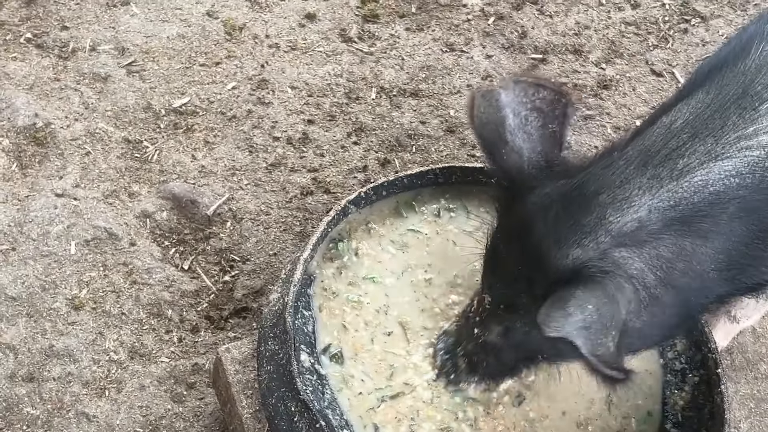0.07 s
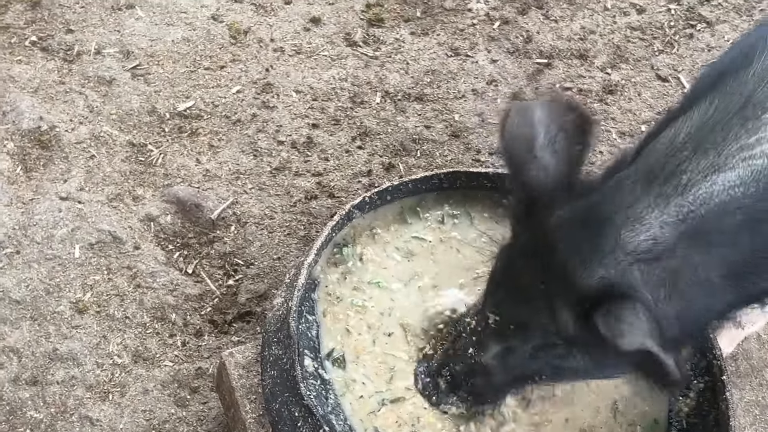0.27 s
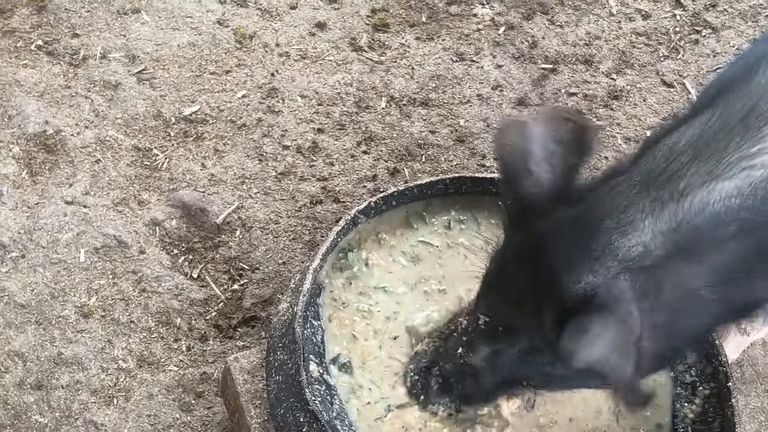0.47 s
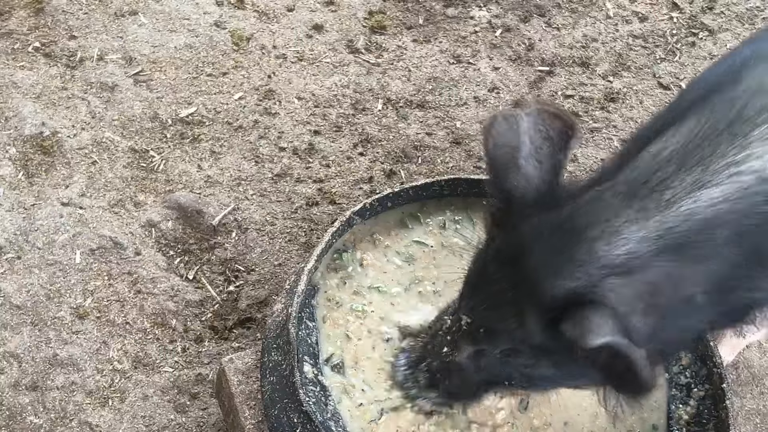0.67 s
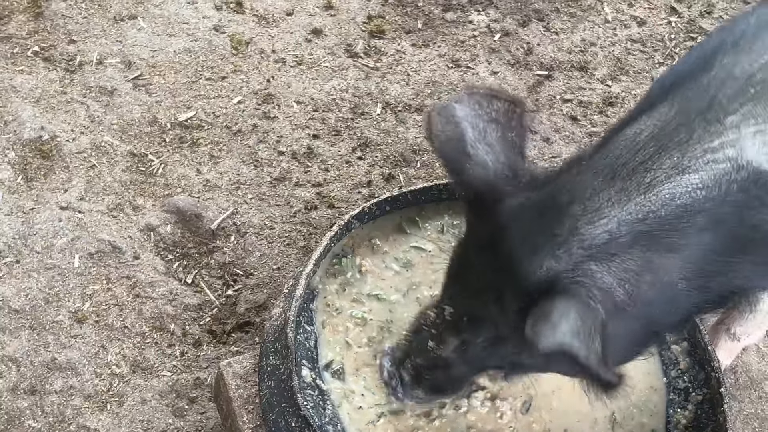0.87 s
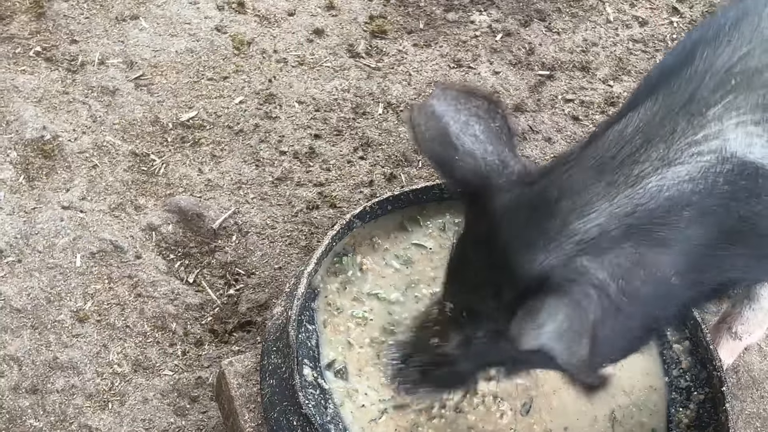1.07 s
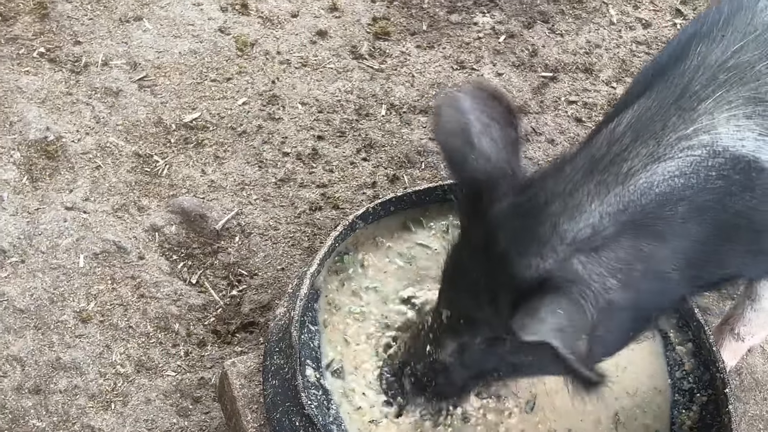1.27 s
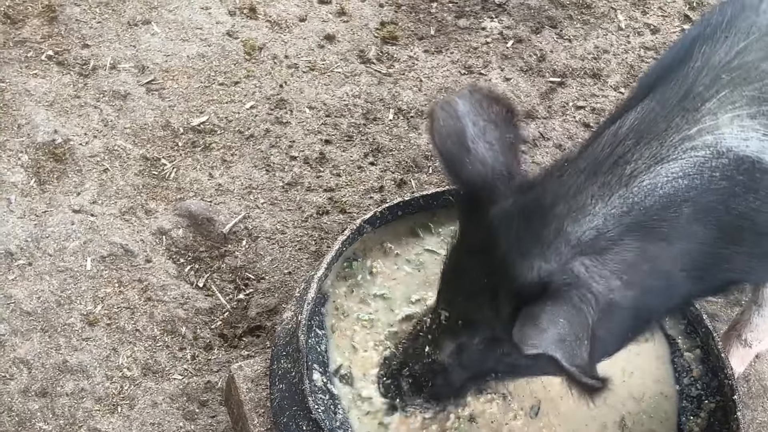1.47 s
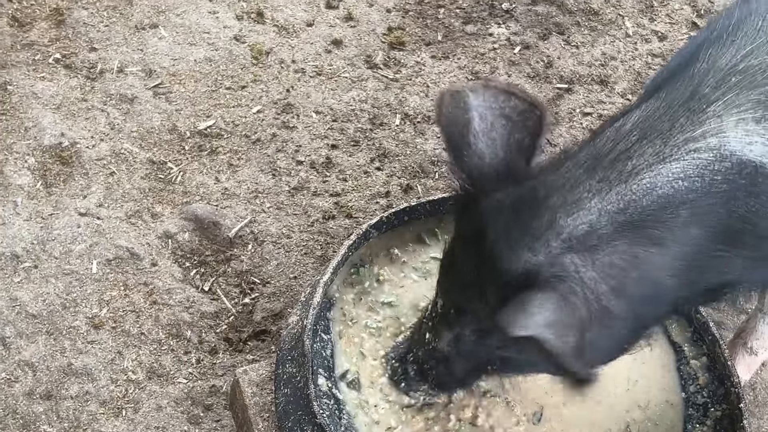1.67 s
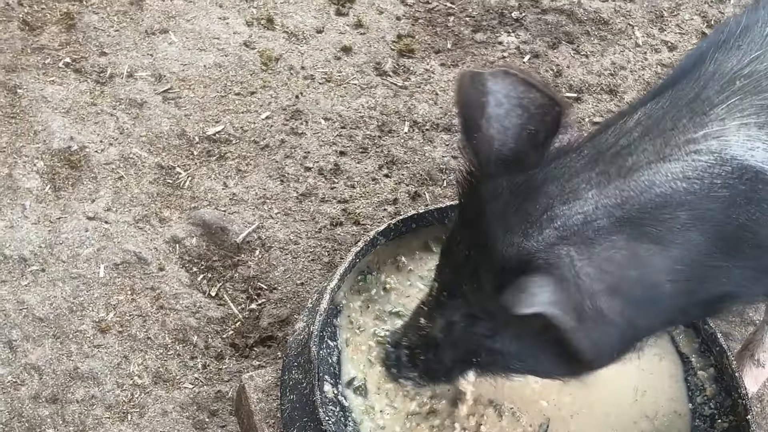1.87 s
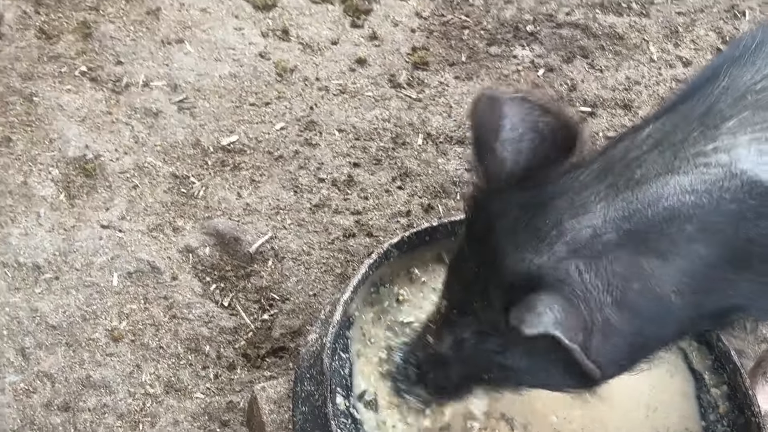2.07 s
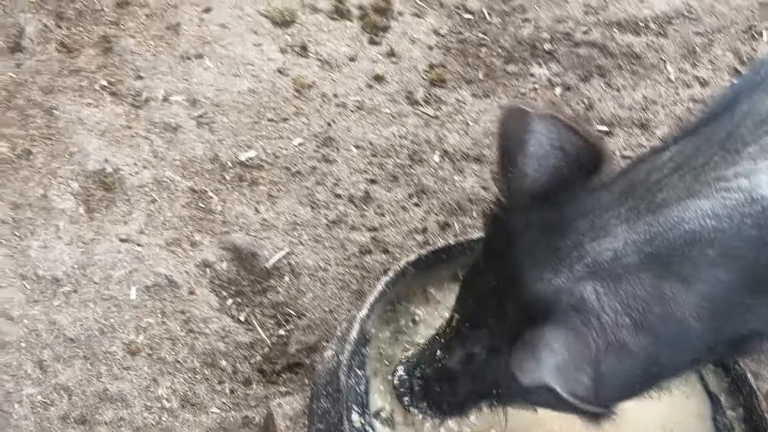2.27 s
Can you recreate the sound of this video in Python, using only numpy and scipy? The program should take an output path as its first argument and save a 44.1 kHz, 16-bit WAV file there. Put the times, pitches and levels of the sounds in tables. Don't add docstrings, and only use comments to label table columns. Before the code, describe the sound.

A pig eats wet mash very close to the microphone: quick irregular squelches, sharp jaw smacks, lip ticks, bubble pops and soft bowl knocks, about four bites a second, over quiet outdoor hiss and pulsing high cricket buzz.

```python
import sys
import numpy as np
from scipy import signal
from scipy.io import wavfile
from scipy.ndimage import uniform_filter1d

SR = 44100
rng = np.random.default_rng(int(sys.argv[2]) if len(sys.argv) > 2 else 0)


def invert_db(x):
    u = np.asarray(x, float) / 20
    return 10 ** u


def put_to_file(sound):
    columns = np.atleast_2d(sound).T
    safe = np.clip(columns, -1, 1)
    whole_steps = np.round(safe * 32767)
    wavfile.write(sys.argv[1], SR, whole_steps.astype(np.int16))


N = 103635


def evened(x):
    return x / np.sqrt(np.mean(x ** 2) + 1e-20)


def add(mix, s, sound):
    at = round(s * SR)
    sound = sound[max(-at, 0):]
    part = mix[max(at, 0):][:len(sound)]
    part += sound[:len(part)]


def ring(hz, t60, glide, rise_cycles=1.5):
    t = np.arange(0, max(t60, 0.002), 1 / SR)
    turns = hz * (t + glide * (t ** 2 / t60 - 0.37 * t))
    attack = 1 - np.exp(-t * hz / rise_cycles)
    shape = attack * invert_db(-60 * (t / t60) ** 1.53)
    return shape / shape.max() * np.sin(2 * np.pi * turns)


def pockets(table, glide, cycles):
    out = np.zeros(N)
    for s, db, hz in table:
        t60 = cycles / hz * invert_db(0.2 * (db + 22))
        add(out, s, invert_db(db) * ring(hz, t60, glide))
    return out


def yard():
    # frequency in Hz, level in dB per Hz.
    hiss_colour = [(24, -37), (40, 3.5), (805, 3.5), (1700, -0.5), (2080, -0.5), (2810, -0.5), (3110, -3),
                   (11100, -7), (15800, -13.5)]
    hiss_db, hum_hz, hum_db = -48, 117, -68.5
    hz = np.fft.rfftfreq(1024, 1 / SR)
    a, b, patches = rng.standard_normal((N // 256 + 5, 513, 3)).T
    patches = uniform_filter1d(patches, size=12, axis=0)
    patches = evened(uniform_filter1d(patches, size=12, axis=1))
    f, level = np.transpose(hiss_colour)
    colour_db = np.interp(np.log(hz + 1), np.log(f + 1), level)[:, None]
    spectrum = (a + 1j * b) * invert_db(colour_db + 2.2 * patches)
    hiss = signal.istft(spectrum, nperseg=1024, noverlap=768)[1][:N]
    wander = evened(uniform_filter1d(rng.standard_normal(N), size=4000))
    hum = np.sin(2 * np.pi * np.cumsum(hum_hz + 3.16 * wander) / SR)
    return invert_db(hiss_db) * evened(hiss) + invert_db(hum_db) * hum


def cricket():
    # start in seconds, level in dB.
    near_phrases = [(-.145, -50), (.065, -50), (.278, -50), (.49, -50), (.708, -50.5), (.93, -50.5),
                    (1.2, -51), (1.432, -51), (1.66, -51), (1.893, -51), (2.142, -50)]
    # start in seconds, level in dB.
    far_phrases = [
        (1.59, -59),
        (1.83, -56),
        (2.07, -57),
        (2.3, -56),
    ]
    near_hz, far_hz, start_drop_hz, scatter_hz = 11580, 11000, 480, 190
    phrase_s, stroke_s, strokes_per_s = 0.176, 0.0011, 224
    weak_stroke_db, uneven_db, swell_db = -1.5, 1.6, -5

    out, t = np.zeros(N), np.arange(0, phrase_s, 1 / SR)
    turns = t * strokes_per_s
    stroke, since = turns.astype(int), (turns % 1) / strokes_per_s
    shape = since / stroke_s * np.exp(-since / stroke_s)
    shape *= invert_db(weak_stroke_db * (stroke % 2))
    warming = np.exp(-t / phrase_s / 0.25)
    fades = np.clip(np.minimum(t, phrase_s - t) / 0.012, 0, 1)
    swell = invert_db(swell_db * warming) * fades
    for phrases, hz in ((near_phrases, near_hz), (far_phrases, far_hz)):
        for s, db in phrases:
            phase, off, size = rng.standard_normal((80, 3))[stroke].T
            pitch = hz - start_drop_hz * warming - scatter_hz * abs(off)
            wing = shape * invert_db(uneven_db * size) * np.sin(2 * np.pi * (pitch * since + phase))
            add(out, s, invert_db(db) * evened(wing) * swell)
    return out


def surroundings(x):
    # delay in seconds, level in dB.
    bounces = [
        (.0023, -19),
        (.0052, -26),
    ]
    pen_t60_s, pen_db, delay_s = 0.08, -12.5, 0.0011
    taps = np.zeros(8000)
    at = np.arange(100, 7980, 20) + rng.integers(0, 20, 394)
    taps[at] = rng.choice([-1., 1.], len(at)) * invert_db(-60 * at / SR / pen_t60_s)
    taps *= invert_db(pen_db) / np.linalg.norm(taps)
    taps[0] = 1
    for s, db in bounces:
        taps[round(s * SR)] += invert_db(db)
    return signal.oaconvolve(x, np.pad(taps, (round(delay_s * SR), 0)))[:N]


def nudges():
    # start in seconds, peak level in dB, pitch in Hz.
    bowl_nudges = [
        (.243, -34.5, 373),
        (.434, -27.5, 356),
        (.636, -30, 274),
        (1.144, -28, 524),
        (.727, -39, 322),
        (1.568, -23.5, 387),
        (1.925, -42.5, 130),
        (1.97, -43, 110),
        (2.03, -40, 233),
    ]
    return pockets(bowl_nudges, glide=0.12, cycles=5.46)


def bubbles():
    # start in seconds, peak level in dB,
    # pitch in Hz.
    bursts = [(0.172, -31, 1850), (0.2429, -28, 4900), (0.2523, -28.5, 4620), (0.394, -29, 1395),
              (0.4348, -28, 1265), (0.4493, -28.5, 1705), (0.5776, -33.5, 3790), (0.623, -29.5, 1890),
              (0.857, -25, 3220), (0.9017, -31.5, 1720), (0.9407, -34.5, 2020), (1.1441, -16.5, 4300),
              (1.2974, -32.5, 3530), (1.3066, -29.5, 2070), (1.3663, -22, 5000), (1.3718, -17.5, 4090),
              (1.604, -23, 3420), (0.66, -28, 4300), (0.641, -26, 1100), (1.6644, -25, 3980),
              (1.7482, -30.5, 1890), (1.9649, -30, 3350), (1.9746, -28.5, 3000), (1.995, -29, 3170),
              (0.376, -30, 3600),
        (0.526, -31, 3660),
        (0.6505, -10.5, 2053),
        (1.3857, -28, 4170),
        (1.558, -34, 1990),
        (1.843, -35.5, 2410),
        (2.017, -28.5, 1880),
        (2.0562, -26, 2700),
        (2.1773, -35.5, 2020),
        (2.3326, -34.5, 3120),
              (0.393, -22, 4300),
        (0.6273, -30, 3020),
        (0.6357, -19.5, 4230),
        (0.645, -20, 4230),
    ]
    faint_pops = [(0.165, -31, 5560), (.299, -36, 2100), (.333, -36, 2100), (.347, -38, 2190), (.386, -36, 853),
                  (.402, -33, 6800), (1.001, -39, 2300), (1.105, -37, 1900), (1.134, -35, 1680),
                  (1.194, -38.5, 2000), (1.347, -37, 3200), (1.475, -36.5, 2180), (1.522, -37, 3100),
                  (1.737, -35, 3100), (1.76, -34, 3420)]
    return pockets(bursts + faint_pops, glide=0.08, cycles=19)


def sprays():
    # start in seconds, length in seconds, level in dB, centre in Hz.
    lip_sprays = [(.23, .022, -35.5, 6660), (0.26, 0.021, -35.5, 7500), (0.429, 0.027, -39, 7540),
                  (0.447, 0.018, -34, 3720), (.636, .022, -37, 13000), (0.89, .006, -40, 9500),
                  (0.899, 0.018, -33, 7800), (.915, 0.04, -43, 8500), (.937, .006, -42, 11000),
                  (0.947, 0.0087, -35.5, 3530), (0.945, .008, -44, 12500), (1.801, 0.024, -41, 7000),
                  (2.007, 0.0054, -40, 10500), (2.017, .006, -45, 9700), (2.025, .017, -36, 10500),
                  (2.055, 0.0046, -33, 9000), (2.057, .008, -34, 10500), (1.458, 0.077, -49, 2760)]
    width, fade_db, grain_db = 1.46, -9.5, 1.5
    out = np.zeros(N)
    for s, length, db, hz in lip_sprays:
        noise, drift = rng.standard_normal((2, 3000))
        u = np.arange(3000) / SR / length
        grain = invert_db(grain_db * evened(uniform_filter1d(drift, size=30)))
        band = signal.butter(2, [hz / width, min(hz * width, 20000)], "band", fs=SR)
        hiss = evened(signal.lfilter(*band, noise * grain))
        fades = np.clip(np.minimum(u / 0.092, (1 - u) / 0.17), 0, 1)
        add(out, s, hiss * invert_db(db + fade_db * u) * fades)
    return out


def ticks():
    # start in seconds, peak level in dB, pitch in Hz.
    partings = [(0.196, -32, 8750), (0.2147, -35, 8950), (0.24, -30, 7500), (0.2585, -28, 7600),
                (0.2625, -22, 7640), (0.601, -38, 7300), (0.635, -19, 6980), (0.6502, -15.5, 5520),
                (0.6794, -49, 9800), (0.844, -31.5, 8300), (0.9019, -29.5, 6640), (0.648, -26, 11600),
                (1.0715, -33, 5800), (1.074, -35, 8500), (1.09, -34, 6500), (1.1269, -34, 6850),
                (1.1442, -21.5, 7400), (1.352, -29, 13000), (1.365, -23, 12900), (1.371, -22.5, 11200),
                (1.615, -35, 9500), (1.3362, -29.5, 10600), (1.3638, -23, 5940), (1.5688, -39, 6000),
                (1.6648, -28.5, 8100), (1.756, -33, 10200), (1.7812, -28, 7800), (2.0078, -37, 9200),
                (2.0265, -26, 9530), (2.0601, -24, 6570), (2.333, -35, 7700)]
    t60_s, scatter, splinter_db = 0.0057, 0.16, -5
    out = np.zeros(N)
    for s, db, hz in partings:
        add(out, s, invert_db(db - 1.5) * ring(hz, t60_s, 0.017, 0.83))
        for off, late in rng.uniform(-1, 1, (3, 2)):
            pitch = hz * (1 + scatter * (off + np.sign(off) / 2))
            splinter = ring(pitch, t60_s / 2, 0.017, 0.83)
            add(out, s + 0.0012 * abs(late), invert_db(db + splinter_db) * splinter)
    return out


def smacks():
    # start in seconds, peak level in dB.
    jaw_smacks = [(0.395, -21), (0.4319, -14), (0.577, -28), (0.6195, -32), (0.6357, -7.5), (0.662, -26),
                  (0.899, -22.5), (1.1101, -23), (1.1425, -10.5), (1.365, -12.5), (1.3714, -19),
                  (1.5676, -10), (1.7804, -15), (1.973, -25.5), (2.0252, -17.5), (2.0582, -13.5)]
    t = np.arange(400) / SR / 0.0011
    shape = t * np.exp(1 - t) / 2
    band = signal.butter(1, [900, 9000], "band", fs=SR)
    out = np.zeros(N)
    for s, db in jaw_smacks:
        crack = signal.lfilter(*band, rng.standard_normal(400))
        add(out, s, invert_db(db - 1.5) * crack * shape)
    return out


def plops():
    # start in seconds, peak level in dB, pitch in Hz.
    cavity_plops = [(0.234, -29.5, 756), (0.251, -26.5, 646), (0.367, -30, 835), (0.391, -30.5, 800),
                    (0.4335, -23.5, 565), (0.445, -25, 785), (0.59, -27.5, 870), (0.636, -20.5, 702),
                    (0.642, -18.5, 569), (0.647, -19, 634), (0.907, -34.5, 720), (0.9385, -37, 700),
                    (1.143, -28.5, 827), (1.364, -25.5, 667), (1.567, -20.5, 613), (1.8, -26, 613),
                    (1.815, -31, 394), (1.982, -32, 940), (2.031, -31.5, 746), (2.193, -35, 870),
                    (.2415, -32.5, 757), (.2468, -31, 630), (.9125, -30, 636), (.9225, -34, 1530),
               (.9245, -33.5, 804), (.9465, -35, 590), (.966, -39, 804), (1.778, -31.5, 850),
               (1.7865, -35, 900), (1.7835, -33, 1500), (1.795, -32, 810), (1.807, -31.5, 814),
               (1.824, -35, 490), (2.0345, -34, 474), (.469, -40, 700), (1.6, -35, 680),
               (1.615, -41.5, 386)]
    return pockets(cavity_plops, glide=0.13, cycles=9.5)


def mash():
    # start in seconds, length in seconds, level in dB,
    # centre of the fizz in octaves above 1 kHz.
    squelches = [(0.168, 0.02, -42.5, 1.8), (0.223, 0.064, -38, 2.4), (0.27, 0.12, -47, 1.27),
                 (0.363, 0.1, -43, 1.5), (0.423, 0.016, -36, 3.5), (0.443, 0.026, -37.5, 0.66),
                 (0.574, 0.046, -46.5, 1.3), (0.618, 0.043, -40, 2), (0.638, 0.012, -29.5, 1.9),
                 (0.651, 0.038, -38, 1.37), (0.848, 0.034, -43.5, 1.4), (0.89, 0.1, -46.5, 1.8),
                 (1.08, 0.081, -51, 2.1), (1.127, 0.021, -45, 1.6), (1.138, 0.032, -36, 3.7),
                 (1.188, 0.28, -53, 1.2), (1.295, 0.026, -39.5, 1.2), (1.33, 0.079, -42, 2),
                 (1.347, 0.043, -38.5, 3.9), (1.555, 0.013, -45, 1.9), (1.562, 0.041, -44.5, 1.8),
                 (1.59, 0.049, -44.5, 0.25), (1.66, 0.011, -36.5, 1.8), (1.704, 0.16, -47, 2.1),
                 (1.775, 0.079, -43.5, 0.53), (1.959, 0.062, -45.5, 1.7), (2.032, 0.046, -47, 0.88),
                 (2.063, 0.027, -47, 3.7), (2.156, 0.064, -52.5, 1.4), (2.329, 0.025, -46, 2.6)]
    grains_per_s, grain_cycles, fizz_fall_db = 11000, 3.37, -3.2
    bite_spread_db, seep_spread_db = 3.5, 5
    seep_db, seep_tilt_db, seep_per_s = -50, -8.5, 2000

    out = np.zeros(N)
    pitches = np.geomspace(300, 15000, num=32)
    count = len(pitches)
    for hz in pitches:
        power = np.zeros(N)
        for s, length, db, centre in squelches:
            a, b = round(s * SR), min(round((s + length) * SR), N)
            fizz = invert_db(db + fizz_fall_db * (np.log2(hz / 1000) - centre) ** 2)
            squeeze = np.sin(np.pi * np.linspace(0, 1, b - a) ** 0.52)
            power[a:b] += (fizz * squeeze) ** 2

        spread = np.array([[bite_spread_db], [seep_spread_db]])
        size = invert_db(spread * np.minimum(rng.exponential(1, (2, N)), 5))
        size *= rng.choice([-1., 1.], N) * np.sqrt(SR * count) / 8
        draw = rng.random((2, N))

        rate = min(max((hz / 3000) ** 0.5, 0.8), 2) / count
        bite = np.sqrt(power / rate / count / grains_per_s) * invert_db(4.0) * size[0]
        bite *= draw[0] < grains_per_s * rate / SR

        seep_level = invert_db(seep_db + seep_tilt_db * abs(np.log2(hz / 3000) + 0.6))
        seep = seep_level * np.sqrt(abs(size[1]) * np.sqrt(SR) * 0.96) / np.sqrt(seep_per_s)
        seep *= draw[1] < seep_per_s / count / SR

        grain = ring(hz, 3 * grain_cycles * (hz / 3000) ** 0.46 / hz, 0.044)
        out += signal.oaconvolve(bite + seep, grain / np.linalg.norm(grain))[:N]
    return out


def scene():
    pig = nudges() + bubbles() + sprays() + ticks() + smacks() + plops() + mash()
    return (yard() + cricket() + surroundings(pig))[None]


def roll_off(x):
    return signal.sosfilt(signal.butter(12, 17110, fs=SR, output="sos"), x)


def record(dry):
    low_cut_hz, edge_hz, over_edge_db = 71, 15800, -38
    x = signal.sosfilt(signal.butter(4, low_cut_hz, "high", fs=SR, output="sos"), dry)
    band_limit = signal.firwin(511, edge_hz, window=("kaiser", 8), fs=SR)[None]
    x = invert_db(over_edge_db) * x + signal.oaconvolve(x, band_limit, "same")
    return roll_off(x)


dry = scene()
out = record(dry)
put_to_file(out)
```